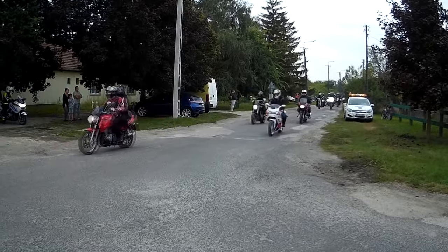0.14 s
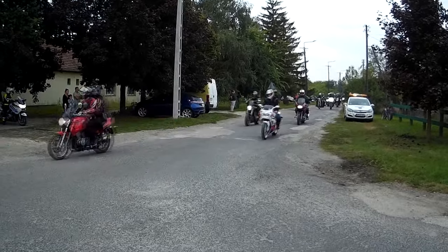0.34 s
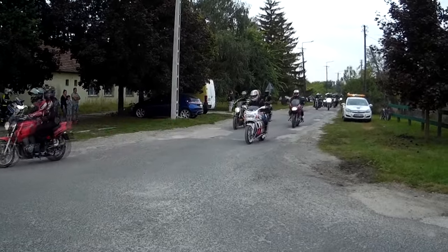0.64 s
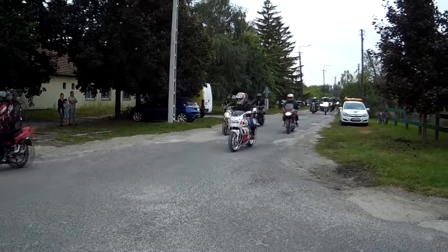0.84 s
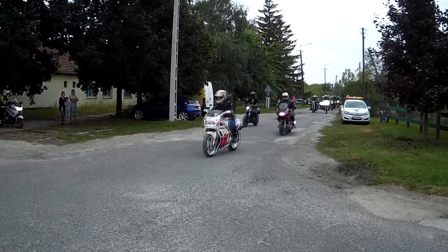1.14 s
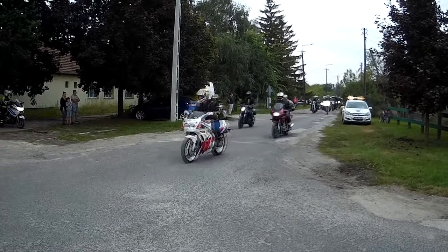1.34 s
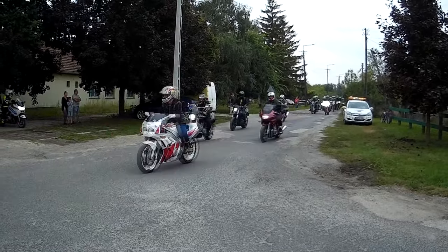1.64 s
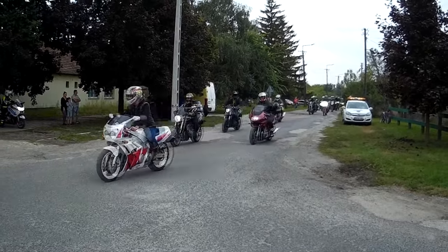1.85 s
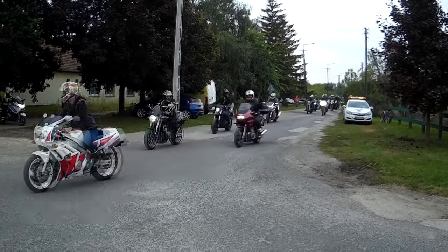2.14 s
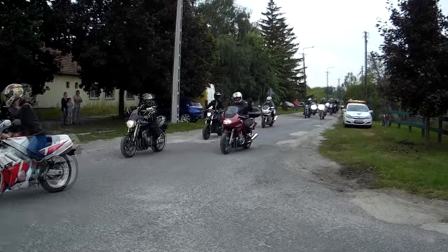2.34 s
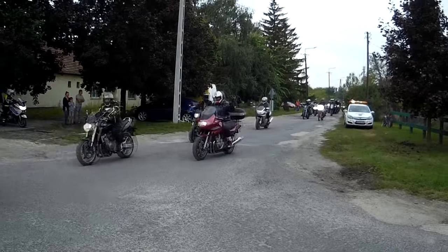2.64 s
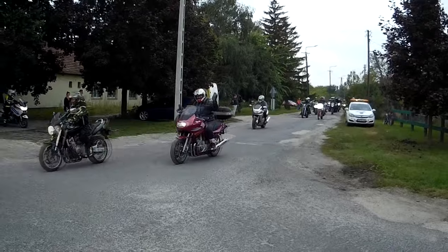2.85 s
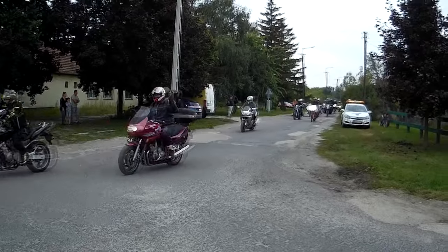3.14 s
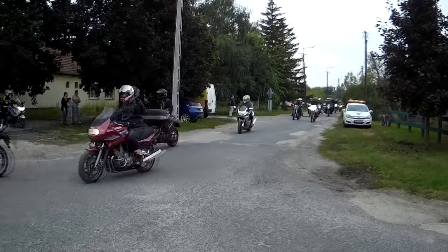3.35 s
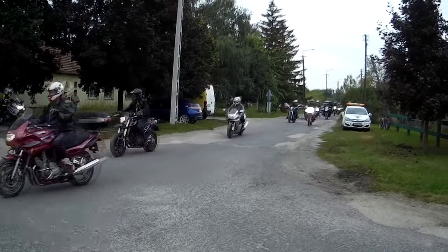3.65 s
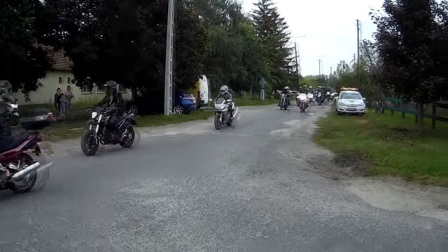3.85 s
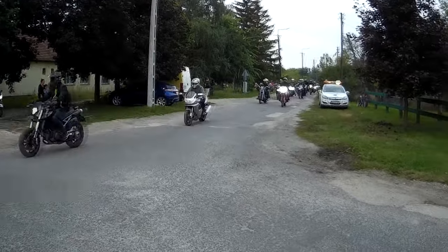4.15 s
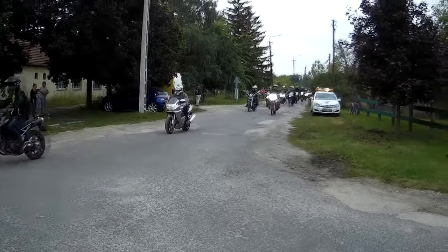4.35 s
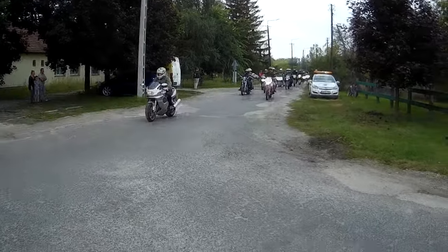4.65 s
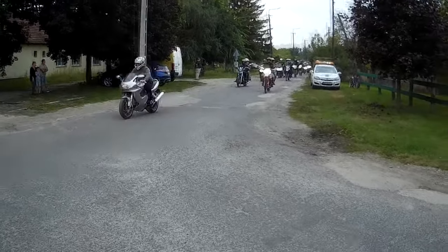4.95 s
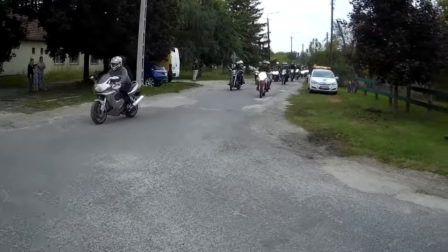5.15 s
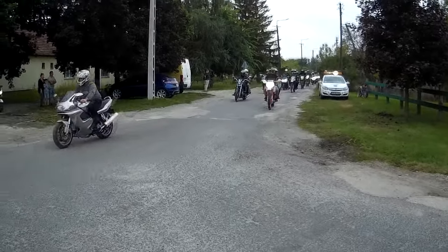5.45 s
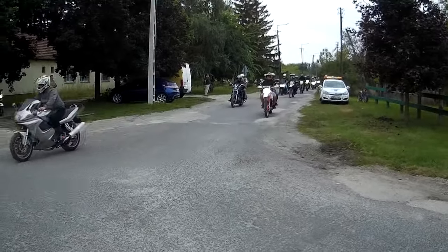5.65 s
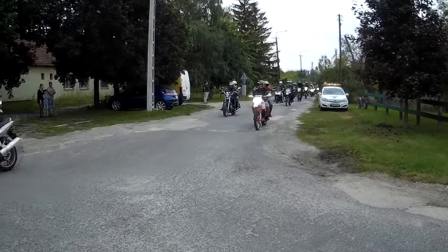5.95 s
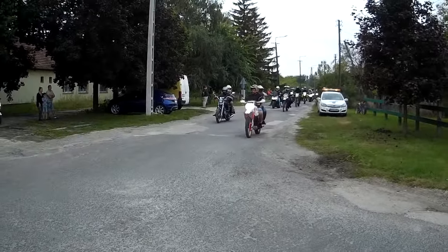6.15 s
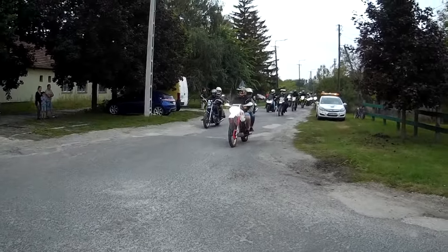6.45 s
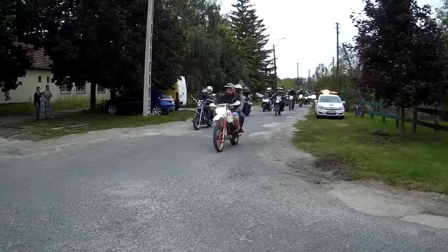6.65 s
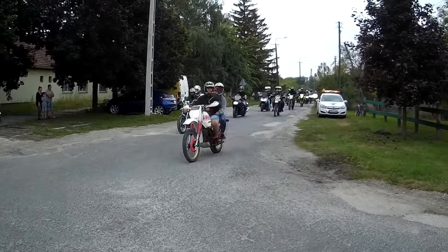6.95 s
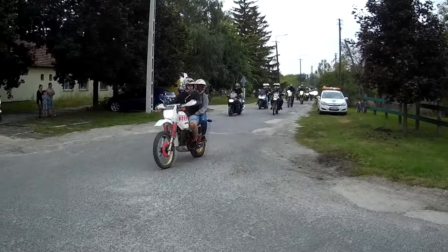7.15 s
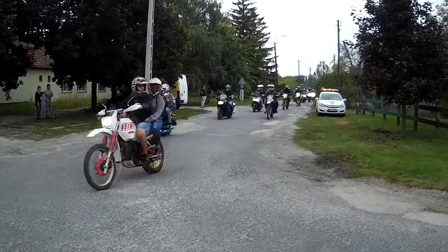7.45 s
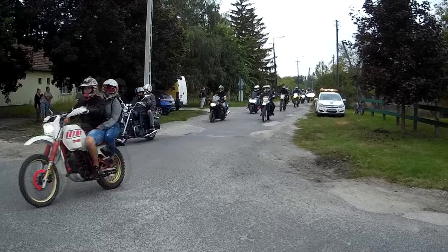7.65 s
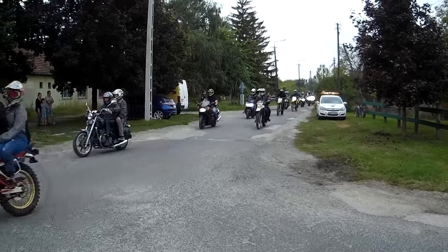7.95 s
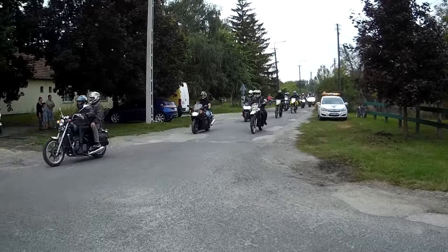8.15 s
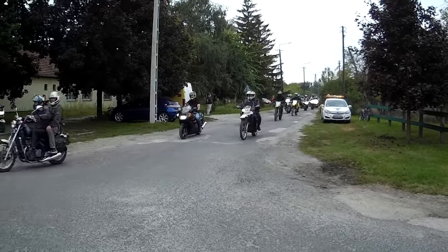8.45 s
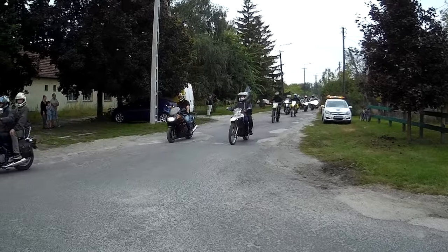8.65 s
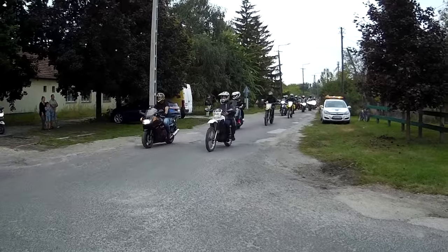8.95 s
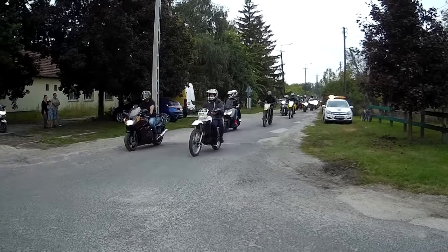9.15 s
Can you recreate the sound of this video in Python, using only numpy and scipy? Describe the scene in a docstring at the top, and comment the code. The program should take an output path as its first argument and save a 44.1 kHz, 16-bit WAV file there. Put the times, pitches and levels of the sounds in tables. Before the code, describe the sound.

Roadside microphone close to passing motorbikes, low rumble and clatter underneath throughout. First a mid-pitched engine pulls away, then a hard, bright raspy burst, followed by two smoother engines sweeping upward in turn. The second half is dominated by a deep, lumpy twin, with a lighter bike humming further off. Brief knocks and clipped snaps dot the sound, the strongest near the end as the twin revs faster.

```python
"""A four-cylinder bike cruises, then pulls away, over the rumble of a procession rounding a village corner.
A raspy twin, a tourer and a sports four follow with rising pitch; a big twin thumps past with an uneven beat,
and a lighter bike is heard further off. Fours are sums of engine-cycle multiples, twins are pulses ringing a pipe;
the column is many pulse trains driving exhausts, rattling chains and tyre hiss, with whines, knocks and
overload crackles. The loudest peaks overload the microphone."""
import sys
import numpy as np
from scipy import signal
from scipy.fft import rfft, irfft
from scipy.io import wavfile
from scipy.ndimage import uniform_filter1d

SR = 44100
rng = np.random.default_rng(int(sys.argv[2]) if len(sys.argv) > 2 else 0)


def persist_wave(psi):
    """Save psi, clipped to +-1, as 16-bit WAV."""
    counts = np.round(np.clip(psi, -1, 1) * 32767).astype(np.int16)
    wavfile.write(sys.argv[1], SR, np.atleast_2d(counts).T)


N = 409688
TIME = np.arange(N) / SR


def undb(db):
    """Decibels to gain."""
    return 10 ** (np.asarray(db) / 20)


def unit(x):
    """Scaled to rms 1."""
    return x / np.sqrt(np.mean(x ** 2))


def curves(table):
    """The columns of a table, joined by straight lines in time."""
    seconds, *columns = np.transpose(table)
    return [np.interp(TIME, seconds, column) for column in columns]


def walk(rate_hz):
    """Smooth chance with spread near 1 that changes rate_hz times a second."""
    points = rng.standard_normal(N // 20)
    return 1.2 * np.interp(TIME * rate_hz, np.arange(len(points)), points)


def band(x, lo_hz, hi_hz, order=4):
    """Band-pass filter."""
    edges_hz = [lo_hz, min(hi_hz, .45 * SR)]
    return signal.sosfilt(signal.butter(order, edges_hz, "band", fs=SR, output="sos"), x)


def colour(x, points, size=4096):
    """Causal minimum-phase filter with the given (Hz, dB) response."""
    hz, db = np.transpose(points)
    bin_hz = np.arange(size // 2 + 1) * SR / size
    log_gain = np.log(undb(np.interp(np.log(bin_hz + 1), np.log(hz), db)))
    cepstrum = irfft(log_gain)[:size // 2]
    cepstrum[1:] *= 2  # folded onto positive time
    impulse_response = irfft(np.exp(rfft(cepstrum, size)))
    return signal.oaconvolve(x, impulse_response)[:N]


def swell(start_s, end_s):
    """Half-sine rise and fall of a bike going by."""
    return np.sin(np.pi * np.clip((TIME - start_s) / (end_s - start_s), 0, 1))


def running(speed, fade_s):
    """1 over the span of a speed table, fading just outside both ends."""
    inside_s = np.minimum(TIME - speed[0][0], speed[-1][0] - TIME)
    return np.clip(inside_s / fade_s + 1, 0, 1)


def pack(slow_hz, fast_hz, scatter_db, jitter, count):
    """Firing pulses of many bikes, each on its own drifting throttle."""
    pulses = np.zeros(N)
    for hz in np.geomspace(slow_hz, fast_hz, count):
        firing_hz = hz * (1 + .06 * walk(.7) + jitter * walk(40))
        turns = np.cumsum(firing_hz) / SR + rng.random()
        fired = np.flatnonzero(np.diff(np.floor(turns)) > 0)
        size_db = scatter_db * rng.standard_normal(N)[fired] + 2 * walk(0.906)[fired]
        pulses[fired] -= undb(size_db) / np.sqrt(hz)
    return pulses


# The column far off, always there: level in dB of pipe bark, engine clatter, chain sizzle, tyre hiss.
FAR_DB = (-26, -30.5, -51.5, -62.5)
# Bikes coming close. Each row: nearest at seconds, approach in seconds, leaving in seconds,
# level in dB of pipe bark, engine clatter, chain sizzle, tyre hiss.
PASSES = [(0.45, 0.35, 0.59, -28, -30.5, -46, -56), (1.35, 0.3, 1, -24.5, -30.5, -45.5, -58),
          (1.87, 0.07, 0.1, -18.5, -46, -52, -64), (2.8, 0.25, 0.99, -24, -26.5, -42, -52),
          (3.75, 0.26, 0.089, -18, -26, -50.5, -55.5), (4.35, 0.33, 0.33, -22.5, -26.5, -48, -57.5),
          (4.82, 0.49, 0.52, -23.5, -24.5, -43, -59.5), (5.9, 0.25, 0.26, -25.5, -30.5, -51, -58.5),
          (6.22, 0.3, 0.054, -38, -27, -47.5, -68.5), (7.45, 0.24, 0.12, -21.5, -30, -50, -63),
          (8.7, 0.45, 0.11, -26.5, -31.5, -47.5, -60), (9.29, 0.19, 0.16, -24, -38, -63, -74)]


def passing():
    """Loudness of bark, clatter, sizzle and hiss: each bike swells and fades over the distant column."""
    power = undb(FAR_DB)[:, None] ** 2
    for nearest_s, approach_s, leaving_s, *parts_db in PASSES:
        width_s = np.where(TIME < nearest_s, approach_s, leaving_s)
        near = np.exp(-((TIME - nearest_s) / width_s) ** 2)
        power = power + undb(parts_db)[:, None] ** 2 * near
    return np.sqrt(power)


# Band edges in Hz of thud, boom, bark, clatter, sizzle and hiss.
COLUMN_EDGES_HZ = (25, 100, 330, 800, 2400, 6000, 15500)
# Colours of exhausts, running gear and hiss. Each row: frequency in Hz, gain in dB.
EXHAUST_COLOUR = [(15, -71.5), (25, -23), (73, -1.5), (128, 3), (186, 2.5), (265, -0.5), (455, -5.5),
                  (610, -3.5), (723, -5), (912, -11), (1000, -13.5), (1300, -50.5), (2200, -120)]
GEAR_COLOUR = [(410, -24), (700, -1), (1190, -2), (1530, -12), (1840, -9.5), (2380, -30), (3270, -32),
               (3960, -25.5), (4670, -38.5), (5510, -39), (6200, -55), (8060, -73), (13600, -120)]
HISS_COLOUR = [(2940, -33), (5000, -4), (5520, 1.5), (6220, -5.5), (7660, -9), (10100, -16), (11900, -16),
               (15500, -31)]
# Low rumble of the whole column. Each row: time in seconds, thud level in dB, boom level in dB.
RUMBLE = [(0, -23.5, -16.5), (1.2, -25, -19), (1.7, -28, -18.5), (2.3, -33, -16), (2.8, -25.5, -16.5),
          (3.8, -27, -14.5), (3.95, -20.5, -14), (4.799, -20.5, -20.5), (5.3, -26, -19),
          (6.5, -28.5, -16.5), (7.8, -29.5, -18.5), (8.8, -27, -13.5), (9.29, -29, -16.5)]


def column():
    """Firings ring the pipes; valves and chains rattle in step with them over an even tyre noise."""
    gas_share, smooth_share, burst_decay_s = 0.62, 1.2, 0.0086
    pulses = unit(pack(slow_hz=14, fast_hz=95.08, scatter_db=0.5, jitter=.015, count=9))
    bursts = unit(signal.lfilter([1], [1, -np.exp(-1 / (burst_decay_s * SR))], -pulses))
    gas = gas_share * bursts * rng.standard_normal(N)
    exhaust = colour(pulses + gas, EXHAUST_COLOUR)
    rattle = (bursts + smooth_share) * rng.standard_normal(N)
    gear, hiss = colour(rattle, GEAR_COLOUR), colour(rattle, HISS_COLOUR)
    parts = (exhaust, exhaust, exhaust, gear, gear, hiss)  # thud, boom, bark, clatter, sizzle, hiss
    gains = [*undb(curves(RUMBLE)), *passing()]
    out = np.zeros(N)
    for k, (part, gain) in enumerate(zip(parts, gains)):
        voice = band(part, COLUMN_EDGES_HZ[k], COLUMN_EDGES_HZ[k + 1])
        running_rms = np.sqrt(uniform_filter1d(voice ** 2, SR // 4))  # over 1/4 s
        out += gain * voice / running_rms
    return out


# Gears, intakes, far pipes and one brief squeak. Each row: start in seconds, end in seconds,
# start in Hz, end in Hz, level in dB, pitch waver as a share.
WHINES = [(0.228, .8, 1850, 1920, -35.5, 0.015), (1.523, 1.625, 1178, 1193, -24, 0.0093),
          (2.296, 2.752, 1910, 2156, -38.5, 0.0097), (2.508, 3.203, 3930, 4720, -49, .02),
          (3.201, 3.803, 2470, 2680, -44.5, 0.023), (4.595, 5.045, 3840, 4120, -43.5, 0.036),
          (4.704, 5.905, 250.2, 288, -18.5, 0.006), (6.001, 6.905, 296.4, 339, -28, 0.0069),
          (6.549, 7.006, 775, 865, -32, 0.0034), (7.196, 7.572, 1295, 1375, -33.5, 0.0093)]


def whines():
    """Narrow gliding tones that swell and fade as their bike goes by."""
    out = np.zeros(N)
    for start_s, end_s, start_hz, end_hz, level_db, waver in WHINES:
        along = np.clip((TIME - start_s) / (end_s - start_s), 0, 1)
        hz = (start_hz + (end_hz - start_hz) * along) * (1 + waver * walk(300))
        tone = np.sqrt(2) * np.sin(2 * np.pi * np.cumsum(hz) / SR)
        out += undb(level_db) * swell(start_s, end_s) * tone
    return out


# Chains, valve gear and pipes ringing as single bikes go by. Each row: start in seconds, end in seconds,
# centre in Hz, width in Hz, level in dB, beats per second.
SIZZLES = [(0, 1.6, 477, 86, -27, 47), (2.5, 3.05, 4120, 350, -46, 55), (2.5, 3.8, 2140, 400, -40, 59),
           (2.45, 3.0, 8700, 1800, -59, 55), (4.55, 5.1, 8600, 2000, -63, 50),
           (5.9, 6.33, 8700, 1800, -60.5, 42.3), (6, 7.6, 647, 130, -27.5, 23), (6, 8, 1293, 200, -36, 23),
           (6.3, 7.6, 4400, 800, -55, 23), (7.2, 9, 5320, 350, -58.5, 19), (7.3, 7.95, 2050, 300, -44, 25),
           (7.9, 9.2, 800, 120, -29, 32), (7.95, 8.7, 4060, 600, -45, 28), (5.14, 5.4, 340, 90, -23, 20)]


def sizzles():
    """Metal parts hiss in a narrow band, shaken at a slightly wandering beat."""
    depth = 0.56
    out = np.zeros(N)
    for start_s, end_s, centre_hz, width_hz, level_db, beat_hz in SIZZLES:
        shake = 1 + depth * np.cos(2 * np.pi * beat_hz * TIME + 0.8 * walk(9.3))
        lo_hz, hi_hz = centre_hz - width_hz / 2, centre_hz + width_hz / 2
        ring = band(shake * rng.standard_normal(N), lo_hz, hi_hz, order=2)
        out += undb(level_db) * swell(start_s, end_s) * unit(ring)
    return out


# Suspension on the rough road. Each row: start in seconds, level in dB, length scale in seconds (twice the rise).
KNOCKS = [(3.13, -15, .0018), (5.193, -11, 0.0022), (5.316, -13, .002), (6.231, -17, .002),
          (7.451, -6, 0.0035), (8.708, -11, .002), (9.06, -1, 0.0038)]
# Colour of a knock. Each row: frequency in Hz, gain in dB.
KNOCK_COLOUR = [(59, -25), (100, 1), (281, 7), (556, -4.5), (1220, -5), (1960, -15.5), (2680, -32.5),
                (5080, -39), (14000, -61)]


def knocks():
    """Short dull blows: coloured noise under a quick rise and exponential fall."""
    envelope = np.zeros(N)
    for start_s, level_db, length_s in KNOCKS:
        age = np.maximum(TIME - start_s, 0) / (length_s / 2)
        envelope += undb(level_db) * age * np.exp(1 - age)
    return envelope * unit(colour(rng.standard_normal(N), KNOCK_COLOUR))


# Sharp overload crackles, many of them on a knock.
# Each row: start in seconds, peak in dB before gain_db, top of the snap in Hz.
CRACKLES = [(0.6279, -24, 7000), (3.134, -22, 3500), (3.8007, -22, 6000), (3.8266, -24, 7000),
            (5.1935, -22, 6500), (5.3167, -22, 4200), (6.231, -27, 3000), (6.8965, -29, 3200),
            (7.452, -24, 3000), (8.71, -24, 3800), (9.0635, -7, 2900)]


def crackles():
    """Tiny overload snaps of decaying noise, over within milliseconds."""
    gain_db, decay_s, lo_hz = -4.5, 0.0007, 1500
    out = np.zeros(N)
    age_s = np.arange(512) / SR
    for start_s, peak_db, top_hz in CRACKLES:
        burst = rng.standard_normal(len(age_s)) * np.exp(-age_s / decay_s)
        snap = band(burst, lo_hz, top_hz, order=2)
        out[int(start_s * SR):][:len(age_s)] += undb(peak_db + gain_db) * snap / np.abs(snap).max()
    return out


# A bike that has left loses treble: dB per octave above DULL_HZ for each second.
DULL_DB_PER_S, DULL_HZ = 13.5, 490


def engine(speed, level, orders, firing_db, pipe, weak_db, scatter_db, waver, wander_db,
           gas_db, gas_hz, gas_turns, fade_s, smear, leaves_s):
    """Multiples of the engine cycle glide through the pipe's resonances, with a puff of gas each cycle."""
    (cycle_hz,), (level_db,) = curves(speed), curves(level)
    pipe_hz, pipe_db = np.transpose(pipe)
    turns = np.cumsum(cycle_hz * (1 + waver * walk(25.04))) / SR
    cycle_scatter = np.interp(turns, np.arange(1000), rng.standard_normal(1000))
    strength = undb(scatter_db * cycle_scatter)
    puffs = rng.standard_normal(N) * np.exp(-(turns % 1) / gas_turns)
    out = undb(gas_db) * unit(band(puffs, 240, gas_hz, order=3))
    heard = running(speed, fade_s)
    on = heard > 0
    dullness_db = DULL_DB_PER_S * np.maximum(TIME[on] - leaves_s, 0)
    for k in range(orders[0], 2 * orders[-1]):
        hz = k * cycle_hz[on]
        db = firing_db[orders.index(k)] if k in orders else weak_db  # cylinders never fire quite alike
        db = db + np.interp(np.log(hz), np.log(pipe_hz), pipe_db)
        db = db - dullness_db * np.maximum(np.log2(hz / DULL_HZ), 0)
        db = db + wander_db * walk(7)[on]  # reflections come and go as the bike moves
        lag = smear * k * np.log(k)  # the pipe spreads each pulse in time
        out[on] -= np.sqrt(2) * undb(db) * np.cos(2 * np.pi * k * turns[on] - lag)
    return out * strength * heard * undb(level_db)


def thumper(speed, level, firings, pipe, scatter_db, jitter_s, gas_db, gas_lo_hz, gas_hi_hz, gas_s, fade_s):
    """Separate beats: each firing kicks the pipe and lets out a puff of gas, the hardest ones most."""
    (cycle_hz,), (level_db,) = curves(speed), curves(level)
    turns = np.cumsum(cycle_hz) / SR
    pulses = np.zeros(N)
    for place, firing_db in firings:
        fired = np.flatnonzero(np.diff(np.floor(turns - place)) > 0)
        size, late = rng.standard_normal((len(fired), 2)).T
        late_samples = (late * jitter_s * SR).astype(int)
        pulses[(fired + late_samples) % N] += undb(firing_db + scatter_db * size)
    puffs = signal.lfilter([1], [1, -np.exp(-1 / (gas_s * SR))], pulses ** 2)
    gas = band(puffs * rng.standard_normal(N), gas_lo_hz, gas_hi_hz, order=3)
    note = undb(gas_db) * unit(gas) - unit(colour(pulses - pulses.mean(), pipe))
    return note * running(speed, fade_s) * undb(level_db)


# Each row: time in seconds, engine cycles per second.
LIGHT_SPEED = [(7.7, 48.7), (8.3, 54.3), (8.65, 59.9)]
# Each row: time in seconds, level in dB.
LIGHT_LEVEL = [(7.7, -22.5), (8.1, -25), (8.65, -28)]
# Strong multiples of the engine cycle, and their gains in dB.
LIGHT_ORDERS = (4, 8)
LIGHT_FIRING_DB = (-5, -3)
# Pipe response. Each row: frequency in Hz, gain in dB.
LIGHT_PIPE = [(200, -2.5), (450, 1), (900, -8)]


def light_bike():
    """A lighter bike further off: rising multiples of its engine cycle through a soft pipe."""
    return engine(LIGHT_SPEED, LIGHT_LEVEL, LIGHT_ORDERS, LIGHT_FIRING_DB, LIGHT_PIPE,
                  weak_db=-16, scatter_db=0.0, waver=0.0022, wander_db=1.5, gas_db=-6.5, gas_hz=985,
                  gas_turns=0.14, fade_s=0.038, smear=1.208, leaves_s=9.7)


# Each row: time in seconds, engine cycles per second.
RED_SPEED = [(0, 46.6), (.35, 46.15), (.85, 48), (1, 47.5), (1.5, 53), (1.75, 58.1), (2.1, 65.8),
             (2.3, 70.4)]
# Each row: time in seconds, level in dB.
RED_LEVEL = [(0, -28.5), (0.6, -24.5), (1.1, -21.5), (1.75, -22.5), (2.3, -21)]
# Strong multiples of the engine cycle, and their gains in dB.
RED_ORDERS = (2, 3, 4, 6, 8)
RED_FIRING_DB = (-7, -2.5, -5, -0.5, -4)
# Pipe response. Each row: frequency in Hz, gain in dB.
RED_PIPE = [(90, -8), (140, 1), (200, -4), (280, -0.5), (340, -1), (390, 2.5), (480, -2.5), (545, -9),
            (590, -1), (680, -22), (900, -31)]


def red_four():
    """Red four, cruising and then pulling away: low multiples come and go as they rise."""
    return engine(RED_SPEED, RED_LEVEL, RED_ORDERS, RED_FIRING_DB, RED_PIPE,
                  weak_db=-9.5, scatter_db=-0.5, waver=0.0045, wander_db=3.5, gas_db=-6.0, gas_hz=776,
                  gas_turns=0.32, fade_s=0.091, smear=1.377, leaves_s=4.2)


# Each row: time in seconds, engine cycles per second.
TOURER_SPEED = [(2.35, 35.8), (2.5, 37.5), (2.8, 41), (3, 44), (3.17, 47.3), (3.25, 49.2), (3.42, 52.81),
                (3.6, 55.8), (3.8, 59)]
# Each row: time in seconds, level in dB.
TOURER_LEVEL = [(2.35, -26), (2.7, -21.5), (3.05, -22), (3.45, -23), (3.8, -20.5)]
# Strong multiples of the engine cycle, and their gains in dB.
TOURER_ORDERS = (4, 6, 8, 10, 12, 16, 20, 24)
TOURER_FIRING_DB = (-8, -4.5, 2.5, -9.5, -3.5, 0.5, -1, -2)
# Pipe response. Each row: frequency in Hz, gain in dB.
TOURER_PIPE = [(150, 0.5), (230, -7), (275, 3.5), (325, -1), (380, -8), (445, 5), (490, 2.5), (560, -3),
               (645, -3.5), (725, -11), (800, -5), (930, -5.5), (1060, -25), (1500, -28), (3000, -41)]


def tourer():
    """Four-cylinder tourer, pulling until its throttle shuts: strong even multiples climb through the pipe."""
    return engine(TOURER_SPEED, TOURER_LEVEL, TOURER_ORDERS, TOURER_FIRING_DB, TOURER_PIPE,
                  weak_db=-13, scatter_db=1.0, waver=0.0024, wander_db=3.0, gas_db=-5.5, gas_hz=1150,
                  gas_turns=0.31, fade_s=0.065, smear=2.6, leaves_s=4.3)


# Each row: time in seconds, engine cycles per second.
SPORT_SPEED = [(3.35, 52.6), (3.55, 54.3), (3.7, 55.82), (3.83, 58.4), (4.05, 61.3), (4.3, 65.5),
               (4.55, 67.7), (4.75, 70.58), (5.2, 74.6), (5.88, 79.52)]
# Each row: time in seconds, level in dB.
SPORT_LEVEL = [(3.35, -33), (3.75, -21.5), (3.95, -22.5), (4.2, -22), (4.6, -21.5), (5.1, -24.5),
               (5.4, -31), (5.88, -23)]
# Strong multiples of the engine cycle, and their gains in dB.
SPORT_ORDERS = (4, 6, 7, 8, 9, 10, 12, 14)
SPORT_FIRING_DB = (-1, 1.5, -2.5, 1, -5.5, 0.5, 1, -2)
# Pipe response. Each row: frequency in Hz, gain in dB.
SPORT_PIPE = [(240, -8.5), (280, 6), (330, -4), (410, -1.5), (480, 1), (540, -6), (600, 0), (670, -5.5),
              (720, -22), (770, -6.5), (820, -9.5), (900, -11.5), (980, -1), (1100, -19.5), (3000, -43)]


def sports_four():
    """Sports four in one long pull: close-set multiples sweep over sharp pipe resonances."""
    return engine(SPORT_SPEED, SPORT_LEVEL, SPORT_ORDERS, SPORT_FIRING_DB, SPORT_PIPE,
                  weak_db=-18.5, scatter_db=1.0, waver=0.002, wander_db=3.5, gas_db=-10.5, gas_hz=1120,
                  gas_turns=0.2, fade_s=0.046, smear=2.6, leaves_s=5.15)


# Each row: time in seconds, engine cycles per second.
DRONE_SPEED = [(2.5, 48.6), (2.8, 52.7), (3, 56.2), (3.15, 58.9), (3.3, 60.6), (3.5, 62)]
# Each row: time in seconds, level in dB.
DRONE_LEVEL = [(2.5, -27), (2.75, -20), (3, -20), (3.25, -22), (3.5, -28)]
# Strong multiples of the engine cycle, and their gains in dB.
DRONE_ORDERS = (5, 10, 15)
DRONE_FIRING_DB = (0, 0, -2)
# Pipe heard from behind. Each row: frequency in Hz, gain in dB.
DRONE_PIPE = [(240, -2), (275, 4.5), (305, -7), (490, -13), (550, -6), (595, 2), (640, -1), (850, -21),
              (920, -4.5), (1100, -23), (1800, -31)]


def raspy_drone():
    """Raspy twin drawing away, its beats merged into a drone of rising multiples."""
    return engine(DRONE_SPEED, DRONE_LEVEL, DRONE_ORDERS, DRONE_FIRING_DB, DRONE_PIPE,
                  weak_db=-17.5, scatter_db=-0.5, waver=0.003, wander_db=1.0, gas_db=-16, gas_hz=1000,
                  gas_turns=0.2, fade_s=0.08, smear=1.5, leaves_s=3.5)


# Each row: time in seconds, engine cycles per second.
RASPY_SPEED = [(1.84, 35.6), (1.9, 36.2), (1.97, 36.85), (2.06, 38.7), (2.14, 40.35), (2.21, 42.6),
               (2.3, 45.3), (2.37, 46.7), (2.45, 47.9), (2.7, 51.3)]
# Each row: time in seconds, level in dB.
RASPY_LEVEL = [(1.84, -13), (1.89, -11), (2.1, -12), (2.27, -15), (2.45, -19.5), (2.7, -30)]
# Two unevenly spaced firings. Each row: place in the cycle 0-1, gain in dB.
RASPY_FIRINGS = [(.33, 0), (.935, -4)]
# Open pipe. Each row: frequency in Hz, gain in dB.
RASPY_PIPE = [(40, -20), (150, -5), (205, 1), (250, 6), (320, 0), (400, 0), (480, -3), (590, -3),
              (720, -12), (1200, -19), (2000, -30), (2700, -43), (5000, -54), (9000, -68), (15000, -85)]


def raspy_twin():
    """Raspy twin, throttle snapped open in the bend: hard, bright, uneven firings, overloaded at the peaks."""
    return thumper(RASPY_SPEED, RASPY_LEVEL, RASPY_FIRINGS, RASPY_PIPE,
                   scatter_db=1, jitter_s=.00004, gas_db=-22, gas_lo_hz=700, gas_hi_hz=1900,
                   gas_s=.0012, fade_s=0.03)


# An open throttle brightens each firing. Each row: frequency in Hz, gain in dB.
OPEN_THROTTLE = [(150, -1), (225, 8), (300, 8), (430, 12.5), (1000, 0.5)]


def opened(note, throttle):
    """An exhaust note grows brighter as the throttle opens."""
    (opening,) = curves(throttle)
    return note + np.clip(opening, 0, 1) * (colour(note, OPEN_THROTTLE) - note)


# Each row: time in seconds, engine cycles per second.
TWIN_SPEED = [(4.75, 16.83), (5.5, 21.59), (5.85, 21.34), (6.05, 22.7), (6.5, 22.32), (6.9, 22.8),
              (7.2, 23.01), (7.45, 23.8), (7.7, 24.11), (8.2, 27.03), (8.7, 30.26), (8.9, 32.73),
              (9.15, 37.13), (9.29, 38.76)]
# Each row: time in seconds, level in dB.
TWIN_LEVEL = [(4.75, -14.5), (5.45, -11), (5.85, -14), (6.05, -10.5), (7.15, -11.5), (7.5, -10.5),
              (8.0, -11.5), (8.35, -15.5), (8.75, -12), (9.29, -15)]
# Two unevenly spaced firings. Each row: place in the cycle 0-1, gain in dB.
TWIN_FIRINGS = [(.37, 0), (.74, -.5)]
# Pipe response. Each row: frequency in Hz, gain in dB.
TWIN_PIPE = [(30, -31.5), (65, -10), (88, -14), (113, 1), (140, 5.5), (176, 1), (205, -13), (260, -11),
             (310, -11), (420, -22.5), (650, -23), (900, -31.5), (2000, -50.5), (5000, -82), (12000, -105)]
# Each row: time in seconds, throttle opening 0-1.
TWIN_THROTTLE = [(7.9, 0.02), (8.35, 0.37), (8.75, 0.55), (9.1, 0.72)]


def big_twin():
    """Big twin, thumping past and then speeding up: uneven kicks ring a low pipe, brighter as it opens."""
    note = thumper(TWIN_SPEED, TWIN_LEVEL, TWIN_FIRINGS, TWIN_PIPE,
                   scatter_db=2.0, jitter_s=.0002, gas_db=-23.5, gas_lo_hz=358, gas_hi_hz=1220,
                   gas_s=0.015, fade_s=0.66)
    return opened(note, TWIN_THROTTLE)


def scene():
    """Six bikes stand out from the column, with whines, ringing metal, knocks and brief overload crackles."""
    small_noises = whines() + sizzles() + knocks() + crackles()
    fours = red_four() + tourer() + sports_four()
    twins = raspy_twin() + raspy_drone() + big_twin()
    return (column() + small_noises + light_bike() + fours + twins)[None]


def record(dry):
    """The microphone overloads on the highest peaks, sooner on the negative side; the top is cut."""
    top_hz = 15750
    clipped = np.clip(dry, -.97, 1)
    return signal.sosfilt(signal.ellip(10, .2, 80, top_hz, fs=SR, output="sos"), clipped)


dry = scene()
out = record(dry)
persist_wave(out)
```